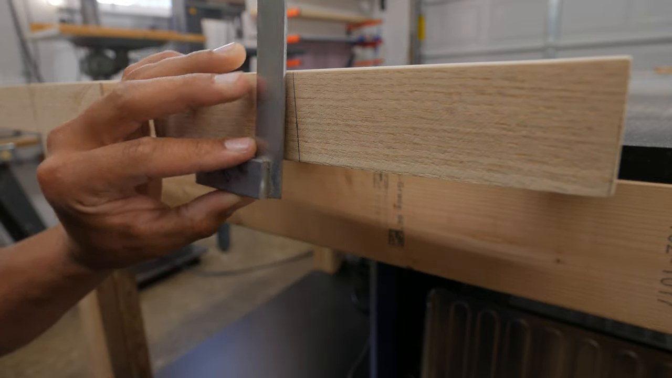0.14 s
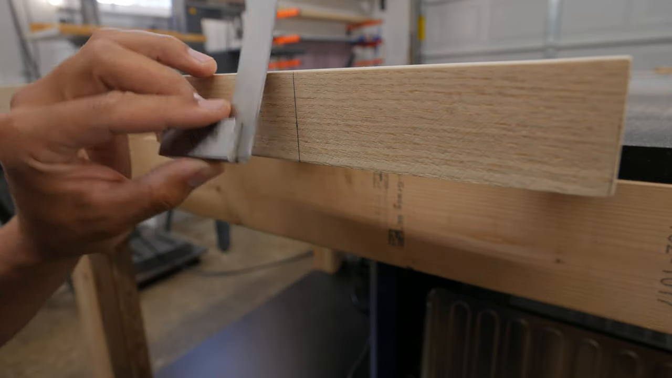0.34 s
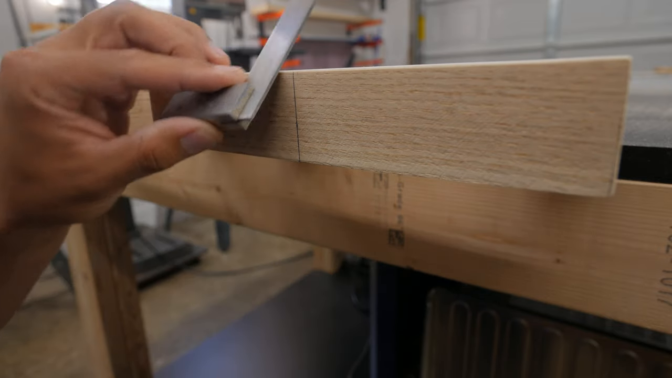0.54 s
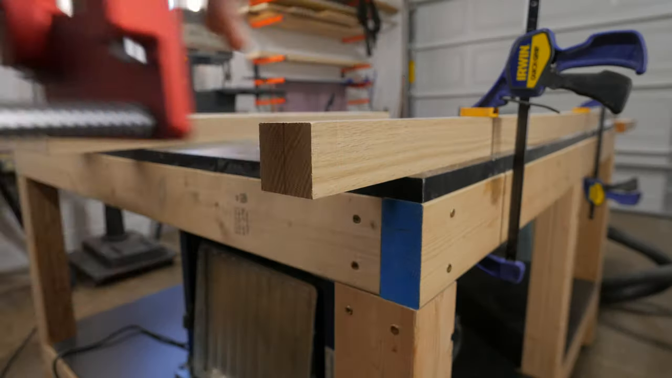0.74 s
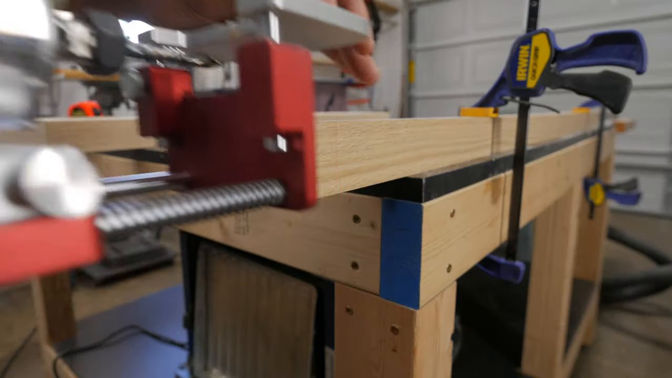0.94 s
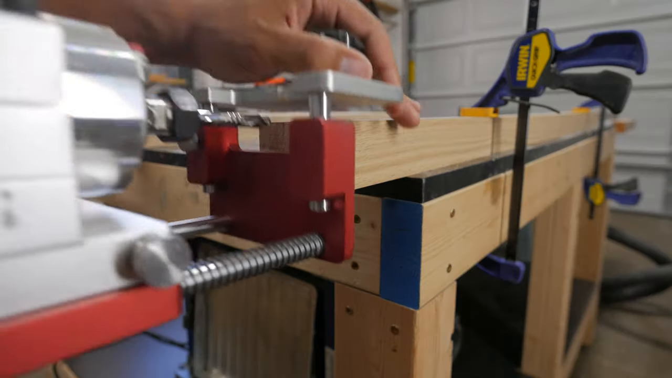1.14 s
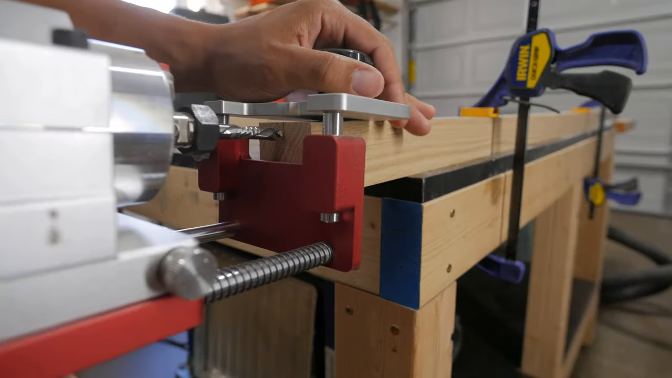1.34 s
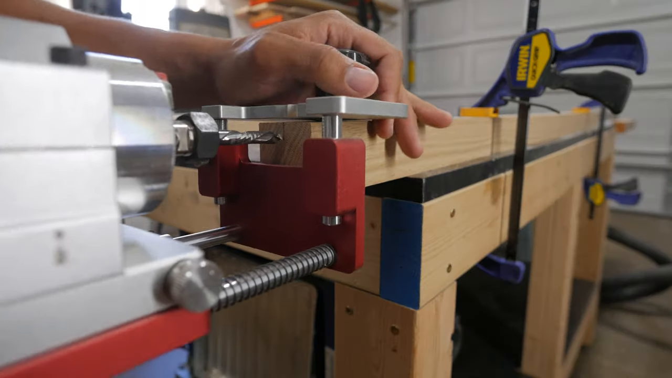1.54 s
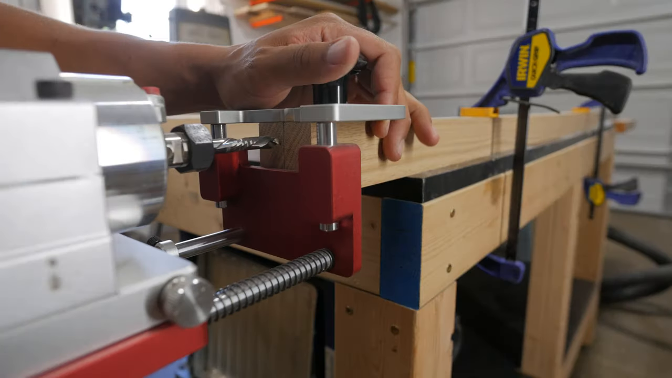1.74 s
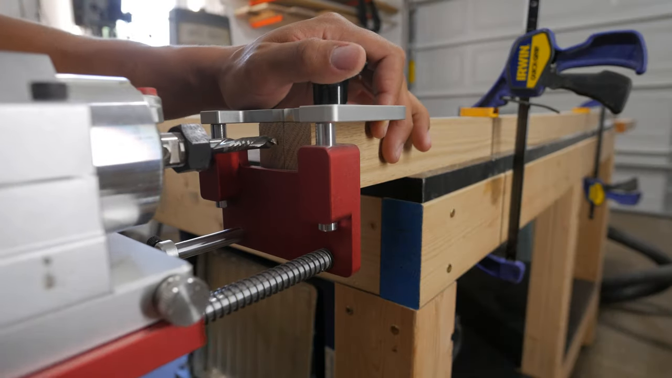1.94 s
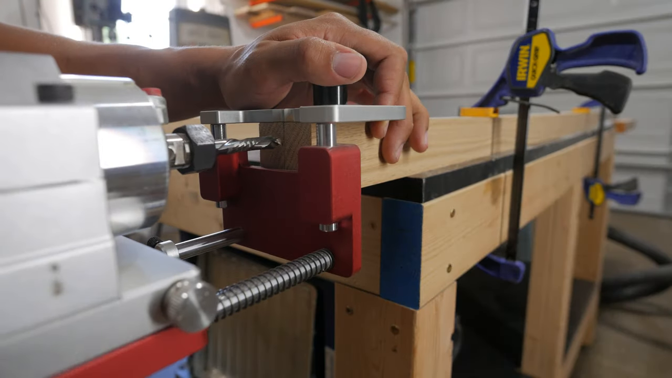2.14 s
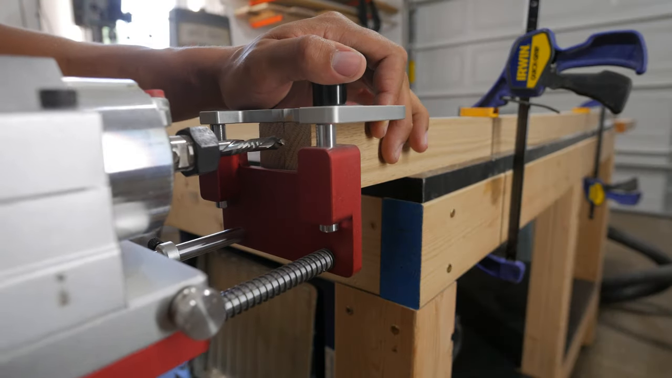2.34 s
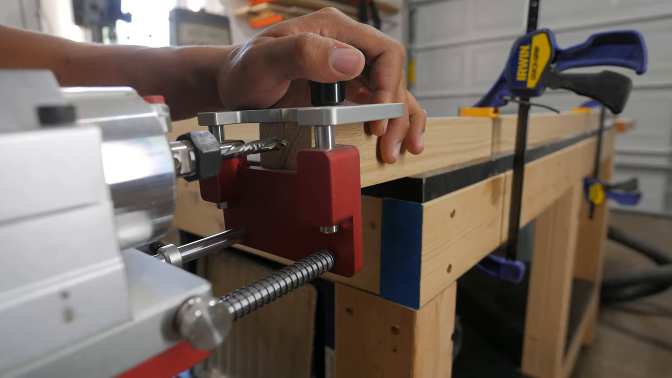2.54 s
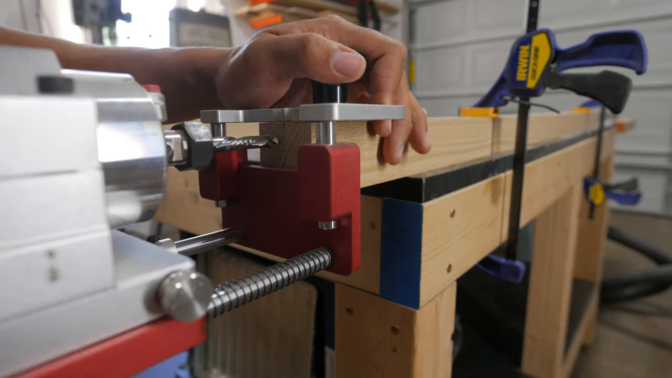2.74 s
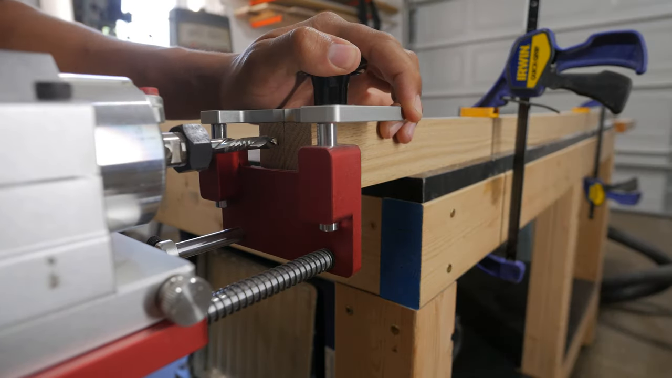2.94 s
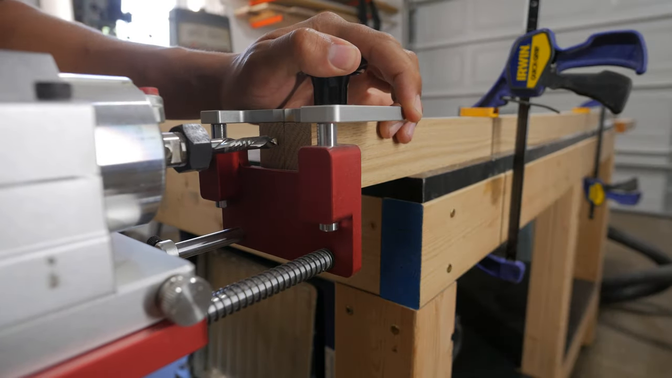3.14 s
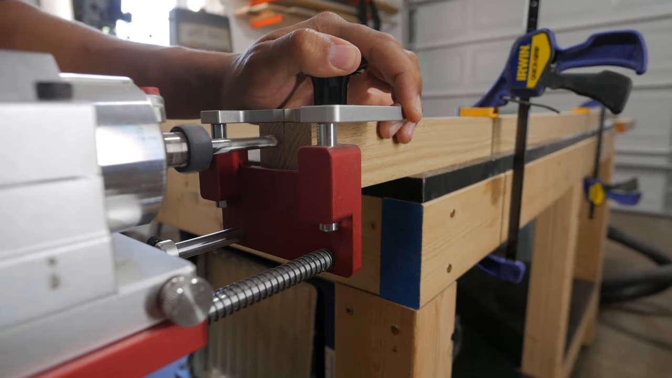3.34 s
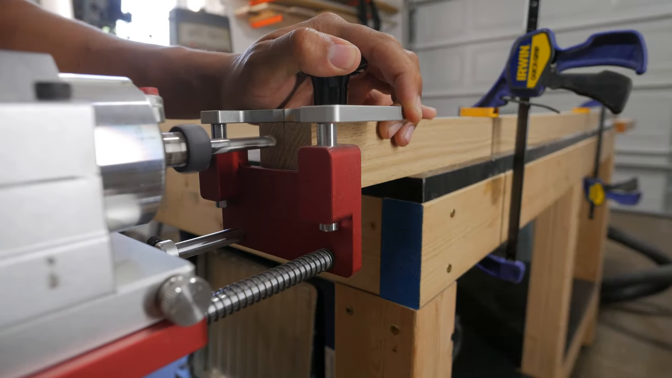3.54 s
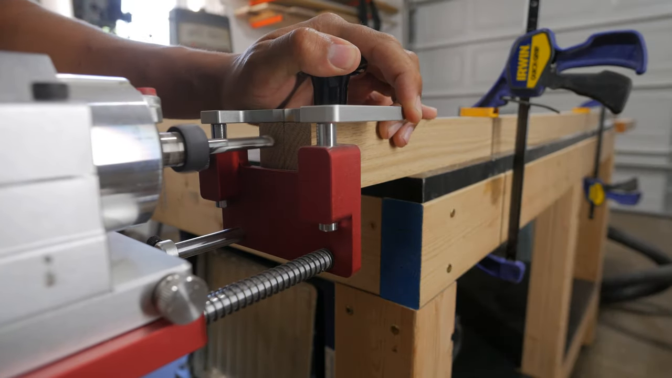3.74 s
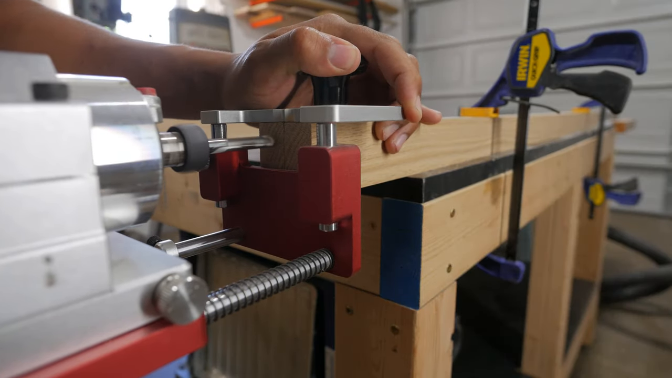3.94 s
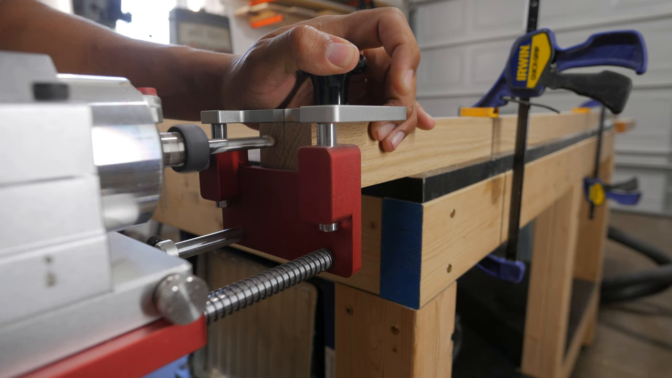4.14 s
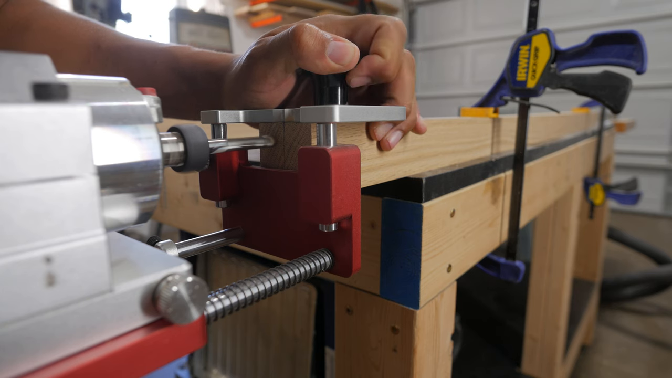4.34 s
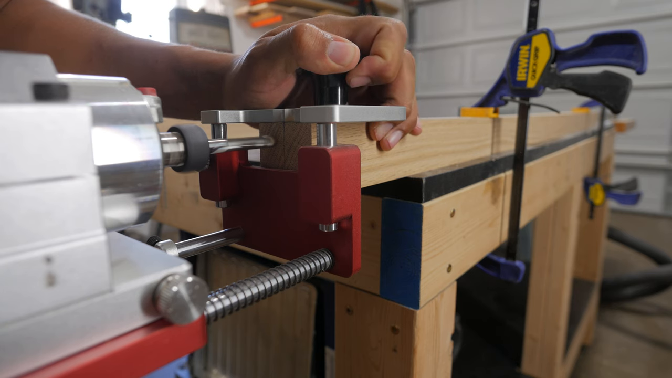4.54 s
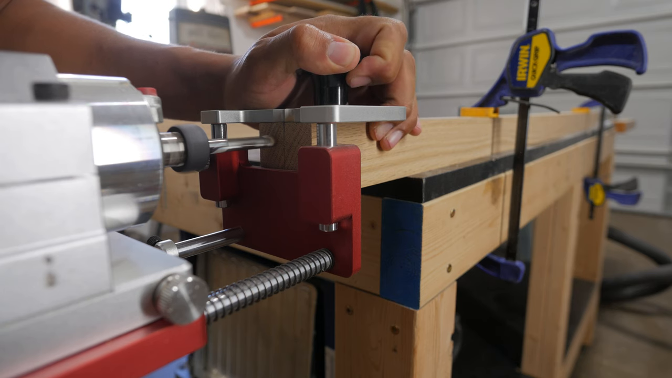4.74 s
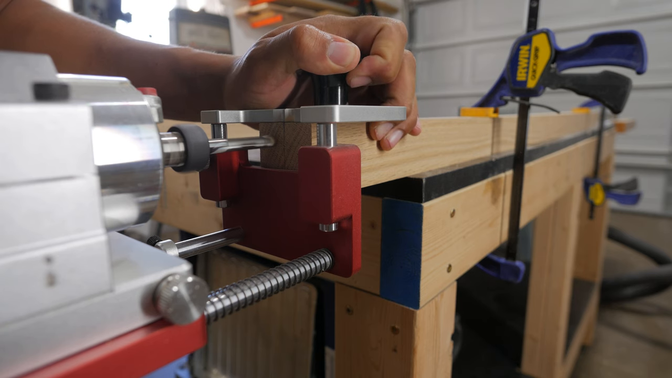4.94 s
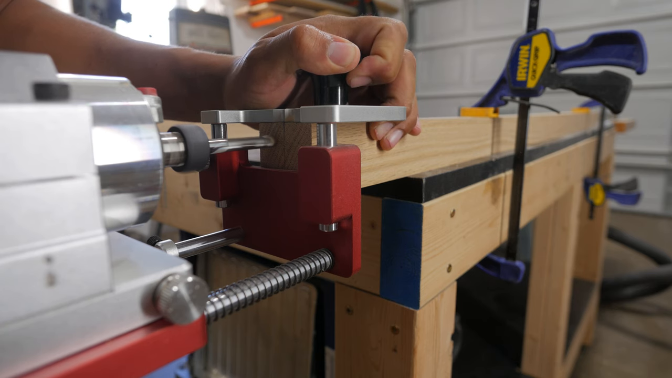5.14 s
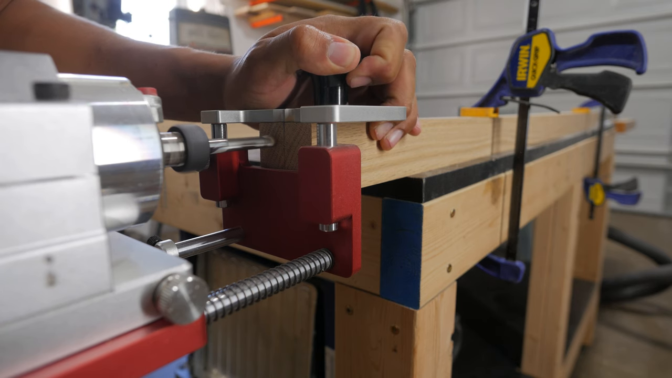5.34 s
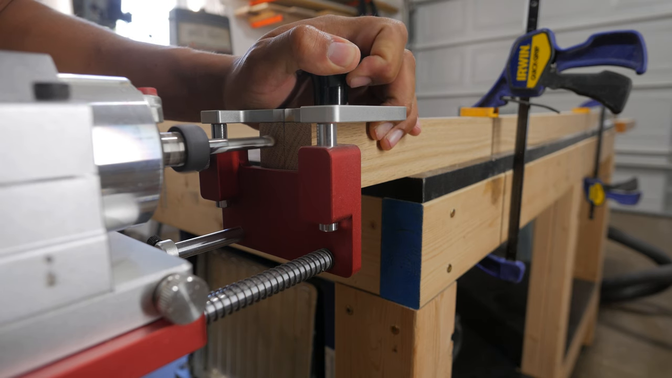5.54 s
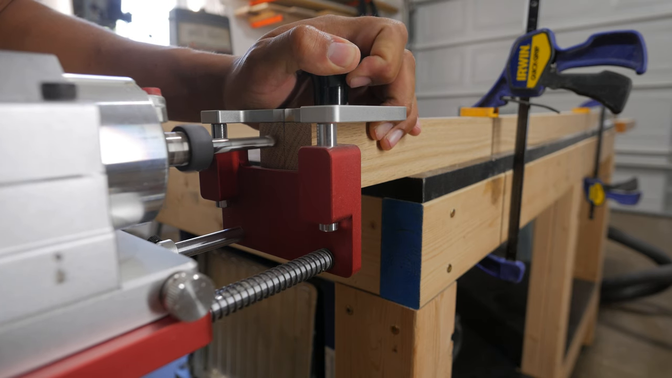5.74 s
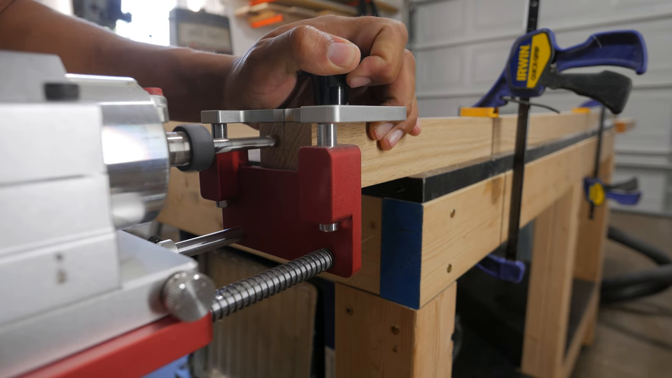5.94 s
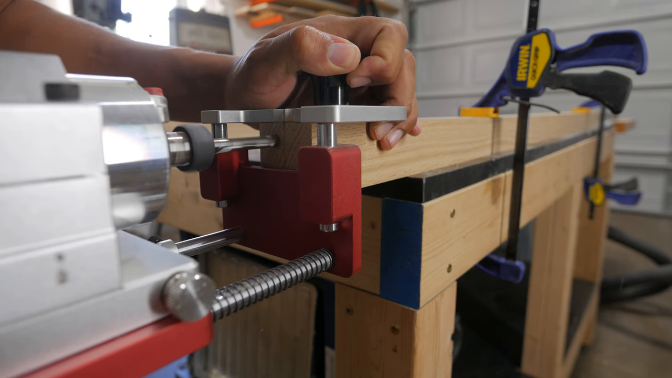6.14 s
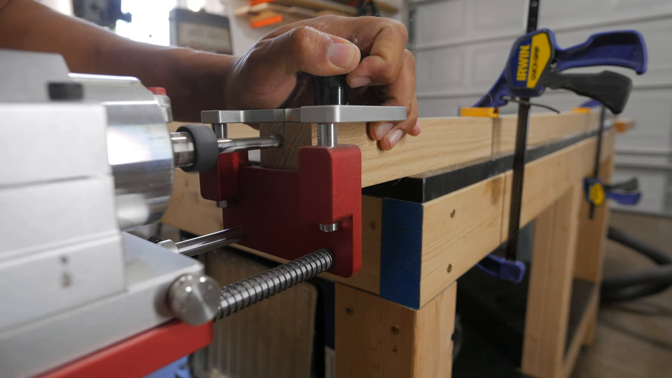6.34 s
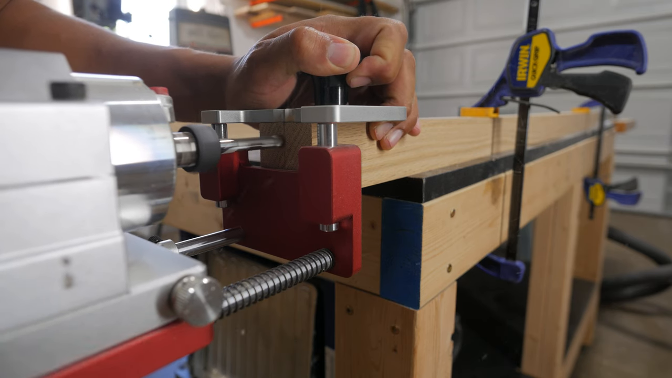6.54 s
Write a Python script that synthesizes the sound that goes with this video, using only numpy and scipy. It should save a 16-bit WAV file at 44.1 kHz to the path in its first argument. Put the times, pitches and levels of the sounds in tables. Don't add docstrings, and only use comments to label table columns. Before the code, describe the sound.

Close sounds at a wooden bench: two soft knocks over a weak distant hum, then a hard ringing metal tap. The scene jumps to a machine thumping and knocking into place, with faint high slide squeaks, small ticks and skin rustle. After a quiet moment its switch clicks and the brushed motor surges with a buzzing throb into a steady fan roar that continues to the end.

```python
import sys
import numpy as np
from scipy import signal
from scipy.fft import rfft, irfft, next_fast_len
from scipy.io import wavfile
from scipy.ndimage import uniform_filter1d, map_coordinates

SR = 44100
rng = np.random.default_rng(int(sys.argv[2]) if len(sys.argv) > 2 else 0)


def int16_out(signal):
    q = np.round(np.clip(np.atleast_2d(signal).T, -1, 1) * 32767)
    wavfile.write(sys.argv[1], SR, q.astype(np.int16))


def how_loud(loudness_db):
    steps = np.asarray(loudness_db, float) / 20
    return 10 ** steps


N = 290619


def unit(x):
    return x / np.sqrt(np.mean(x ** 2) + 1e-20)


def along(points, hz):
    f, v = np.transpose(points)
    return np.interp(np.log(hz + 1), np.log(f + 1), v)


def curves(rows):
    s, *cols = np.transpose(rows)
    return [np.interp(np.arange(N) / SR, s, c) for c in cols]


def during(start, stop):
    t = np.arange(N) / SR
    return (t >= start) & (t < stop)


def wobble(rate):
    coarse = np.arange(0, N + 16, 16)
    knots = rng.standard_normal(int(N * rate / SR) + 4)
    return np.interp(np.arange(N), coarse, map_coordinates(knots, [coarse * rate / SR]))


def filtered(x, response):
    m = next_fast_len(x.shape[-1] + 8192)
    return irfft(rfft(x, m) * response(np.fft.rfftfreq(m, 1 / SR)), m)[..., :x.shape[-1]]


def high_pass(x, corner_hz):
    return filtered(x, lambda f: (1j * f / (corner_hz + 1j * f)) ** 2)


def hiss(spectrum):
    return unit(filtered(rng.standard_normal(N), lambda hz: how_loud(along(spectrum, hz))))


def tone(hz):
    return np.sqrt(2) * np.sin(2 * np.pi * (np.cumsum(hz) / SR + rng.random()))


def modes(body):
    return lambda f: sum((-1) ** k * how_loud(db) * 1j * f * w / (c * c - f * f + 1j * f * w)
                         for k, (c, w, db) in enumerate(body))


def echo(t60):
    hz, t, z = signal.stft(rng.standard_normal(SR), SR, nperseg=256)
    decay = how_loud(-60 * t / t60 * (1 + hz[:, None] / 4000))
    tail = signal.istft(z * decay, SR, nperseg=256)[1][:SR]
    tail = tail * (1 - np.exp(-np.arange(SR) / SR / 0.00071))
    return tail / np.linalg.norm(tail)


CUTS = [.7278, 2.8975]


def swells(rows, rise):
    t, edges, power = np.arange(0, N, 64) / SR, np.array([0, *CUTS, 9]), 0
    for s, fade, db in rows:
        lag = (t - s) / abs(fade)
        same_shot = np.searchsorted(edges, t, "right") == np.searchsorted(edges, s, "right")
        power = power + how_loud(2 * db - 20 * np.where(lag > 0, lag, -lag / rise)) * same_shot
    return np.sqrt(np.repeat(power, 64)[:N])


ON_S, RAMP_S, RAMP_PER_S2 = 3.333, 3.455, 1000
CREEP, TOP_TURNS, KNEE = 80, 495.2, 9


def rotor():
    ramp = CREEP * np.logaddexp(0, RAMP_PER_S2 * (np.arange(N) / SR - RAMP_S) / CREEP)
    ramp = np.maximum(ramp - ramp[round(ON_S * SR)], 0)
    return ramp / (1 + (ramp / TOP_TURNS) ** KNEE) ** (1 / KNEE)


# time in seconds, level in dB.
CURRENT = [(3.33, -37), (3.36, -23), (3.395, -16), (3.43, -2), (3.57, -3.5), (3.7, -1.5), (3.77, -13),
           (3.86, -13), (3.95, -24), (4.3, -37)]


def motor_current():
    return curves(CURRENT)[0]


# start in seconds, stop in seconds, level in dB.
DRONE = [
    (0, .345, -43),
    (.385, 0.44, -45),
    (.6, 1, -33.5),
]


def far_drone():
    fits = uniform_filter1d(sum(how_loud(db) * during(start, stop) for start, stop, db in DRONE), size=1300)
    hz = 114.5 + 30 * np.arange(N) / SR
    return during(0, CUTS[0]) * fits * tone(hz)


# frequency in Hz, density in dB per Hz.
RUMBLE = [(15, -65.5), (25, -56.5), (54, -13), (173, -6), (207, -1.5), (288, -10.5), (320, -4), (345, -9),
          (465, -11), (900, -40), (1170, -62.5), (1980, -120)]
SHUFFLE = [(300, -29), (600, 11.5), (1200, 4), (2500, -3.5), (3300, -8.5), (5000, -69)]
RUSTLE = [(1500, -1), (3000, 3.5), (5500, 4), (8000, 3), (11000, 1), (16000, -5)]
# rumble in dB, shuffle in dB, rustle in dB.
SHOTS = [
    (-47.5, -52.5, -59.5),
    (-49.5, -59.5, -62.5),
    (-56, -69.5, -69),
]
# time in seconds, fade in seconds, rumble in dB, shuffle in dB.
MOVES = [(.27, 0.15, -45, -56), (.72, 0.066, -34, -62), (0.758, 0.24, -46, -47), (1.25, 0.57, -62, -51),
         (1.76, 0.14, -43.5, -59), (2.16, 0.23, -46.5, -75), (2.861, 0.12, -36.5, -56.5)]
# time in seconds, fade in seconds, level in dB.
BRUSHES = [(.25, 0.36, -59.5), (.74, .2, -57.5), (.862, 0.063, -44.5), (1.29, .15, -77),
           (1.915, 0.037, -50.5), (1.99, .03, -59), (2.155, 0.1, -54), (2.3, 0.14, -55.5),
           (2.38, 0.06, -57), (2.48, 0.12, -57), (2.59, 0.099, -52), (2.73, 0.13, -59), (2.82, .025, -55),
           (2.89, .04, -59.5)]
MOVE_RISE, BRUSH_RISE = 0.82, 0.36
DUCK_DB, SHAKE_DB = -18, -48.5


def workshop():
    rumble = hiss(RUMBLE) * how_loud(1.2 * wobble(14))
    shuffle = hiss(SHUFFLE) * how_loud(1.9 * wobble(25))
    rustle = hiss(RUSTLE) * how_loud(1.0 * wobble(60))
    shot = np.searchsorted(CUTS, np.arange(N) / SR, "right")
    rest = how_loud(np.array(SHOTS)[shot].T + DUCK_DB * (rotor() / TOP_TURNS) ** 2)
    shake = during(ON_S, 9) * how_loud(SHAKE_DB + motor_current())
    floor_moves = swells([(s, fade, db) for s, fade, db, _ in MOVES], MOVE_RISE)
    shuffle_moves = swells([(s, fade, db) for s, fade, _, db in MOVES], MOVE_RISE)
    out = rumble * (np.hypot(rest[0], floor_moves) + shake)
    out += shuffle * np.hypot(rest[1], shuffle_moves)
    return out + rustle * np.hypot(rest[2], swells(BRUSHES, BRUSH_RISE))


# frequency in Hz, width in Hz, level in dB.
BOARD = [(220, 37, -2.5), (355, 66, -2), (555, 40, -3), (1686, 300, -17.5)]
SQUARE = [(131, 20, -6), (196, 7, 6), (315, 30, -2.5), (383, 28, -1.5), (576, 19, -4), (1083, 30, -4),
          (1270, 110, -10), (1480, 120, -13), (1635, 13, 0), (1815, 17, 1.5), (2050, 41, -12),
          (2280, 120, -14), (2470, 70, -11), (3150, 350, -29)]
FENCE = [(349, 84, -1), (500, 160, -2), (790, 210, -3), (1570, 670, -12), (3080, 1200, -14.5)]
BENCH = [(132, 20, 1), (205.7, 10, 6.5), (293, 56, -1), (347, 23, 0.5), (410, 63, -2), (657, 124, -6),
         (713, 45, -2.5), (870, 150, -8), (1000, 120, -8.5), (1420, 560, -19), (3200, 960, -18)]
# time in seconds, blow in dB, echo in dB, echo t60 in seconds, contact cut-off in Hz.
KNOCKS = [
    (0.1963, -29.5, 4, 0.27, 450),
    (0.2139, -28, 0, 0.51, 1100),
    (.582, -16, 4, 1, 2640),
    (0.8551, -27, 9, 0.87, 1990),
    (1.2585, -12.5, 6.5, 0.67, 1420),
    (2.7816, -34, 16, 0.2, 1026),
]


def knocks():
    out, t = np.zeros(N + SR), np.arange(SR) / SR
    bodies = [BOARD, BOARD, SQUARE, FENCE, BENCH, BENCH]
    for (s, blow_db, echo_db, t60, soft_hz), body in zip(KNOCKS, bodies):
        push = how_loud(echo_db) * echo(t60)
        push[0] += 1
        ring = filtered(push, lambda f: modes(body)(f) / (1 + 1j * f / soft_hz) ** 2 * (1j * f / (90 + 1j * f)) ** 2)
        stop = min(c for c in [*CUTS, 9] if c > s)
        loudness = np.sqrt(np.mean(ring[:SR // 10] ** 2))
        out[round(s * SR):][:SR] += how_loud(blow_db - 7.5) * ring / loudness * (t < stop - s)
    return out[:N]


# time in seconds, peak in dB, first ring in Hz, second ring in Hz, second
# ring in dB.
TICKS = [(.5821, -3.5, 1500, 5700, -15.5), (.5842, -8, 1780, 5300, -26), (.5882, -14, 1750, 1150, -18),
         (.598, -15.5, 200, 400, -30), (.615, -14.5, 205, 400, -30), (.5815, -35, 7300, 12000, 0),
         (.8525, -34, 2000, 4880, -9), (1.2592, -20, 2650, 3500, -14), (1.2612, -25, 3150, 5300, -14),
         (1.3, -24, 720, 950, -26), (1.328, -15.5, 228, 400, -30), (1.2597, -38, 7600, 5400, -1),
         (1.3444, -33, 2620, 3600, -8), (1.508, -50, 3850, 3300, -3), (1.546, -52, 3900, 4500, -3),
         (1.598, -50, 2400, 3400, -2.5), (1.6386, -42, 2500, 1900, -5), (1.666, -46, 2600, 5000, -5),
         (1.6881, -48, 2200, 4000, -3), (1.9101, -42, 2320, 10500, 0), (2.153, -44, 2800, 8600, 2),
         (2.7825, -41, 950, 1500, -10), (2.309, -32, 1800, 4050, 2), (2.3087, -32, 5700, 9500, 2),
         (2.3092, -40, 1300, 2800, 4), (3.256, -62, 3200, 9000, 3), (3.2606, -39, 3150, 6700, 13),
         (3.2605, -41, 1150, 10300, 16), (3.2606, -38, 3950, 9200, 6), (3.2607, -42, 5600, 8000, 7),
         (3.2607, -39, 13100, 14700, 2), (3.2652, -46, 3150, 850, 2)]
JOLTS = [(3.3415, -40, 720, 1300, -8), (3.3437, -46, 3200, 3600, -3), (3.3522, -47, 3300, 3600, -3),
         (3.3603, -47, 3150, 3600, -3), (3.3685, -47, 3200, 3500, -3), (3.3768, -46, 3200, 3500, -3),
         (3.3665, -35.5, 710, 1400, -10), (3.3815, -47, 1900, 1300, -4), (3.391, -41, 1350, 1600, -4),
         (3.4245, -40, 1350, 2100, -3), (3.449, -43, 1950, 1300, -3), (3.4745, -37, 1300, 1900, -2),
         (3.482, -31, 1900, 1300, -2), (3.4905, -35, 1350, 1900, -5), (5.81, -33.5, 470, 600, -6)]
THUDS = [
    (.8527, -10.5, 500, 1600, -24),
    (.2, -27, 330, 700, -20),
]
TICK_CYCLES, JOLT_CYCLES, THUD_CYCLES = 7.2, 51, 4


def ticks(rows, cycles, bass_hz):
    out, t = np.zeros(N + SR), np.arange(SR // 8) / SR
    for s, db, first_hz, second_hz, second_db in rows:
        first = np.sin(2 * np.pi * first_hz * t) * how_loud(-60 * t / (0.0069 + cycles / first_hz))
        second = np.sin(2 * np.pi * second_hz * t) * how_loud(second_db - 60 * t / .006)
        noise = uniform_filter1d(rng.standard_normal(len(t)), size=2)
        crack = noise * (0.24 * how_loud(second_db - 60 * t / 0.011) + how_loud(second_db - 25.5 - 60 * t / 0.11))
        hit = (first + second + crack) * (1 - np.exp(-t / 0.00013))
        out[round(s * SR):][:len(t)] += how_loud(db) * (hit + 0.14 * np.roll(hit, 170))
    return high_pass(out[:N], bass_hz)


# time in seconds, fade in seconds, level in dB.
GLIDE = [
    (.74, 0.18, -58.5),
    (1.02, 0.08, -49.5),
    (1.3, 0.1, -56.5),
    (1.42, 0.14, -57),
]
# frequency in Hz, width in Hz, level in dB.
RODS = [(3160, 240, 3), (5470, 1400, -1.5)]
# start in seconds, fastest moment in seconds, stop in seconds, top pitch in Hz,
# slope in Hz per second, level in dB.
SQUEAK = [(.728, .74, .772, 9900, 16000, -65), (.775, .805, .84, 10000, 22000, -67),
          (.948, 1.014, 1.066, 10480, 19000, -61.5), (1.066, 1.05, 1.105, 9900, 36000, -63),
          (1.19, 1.228, 1.262, 8560, 11000, -64), (1.28, 1.3, 1.37, 8450, 3000, -73),
          (1.375, 1.415, 1.49, 8400, 22000, -69)]
GLIDE_RISE = 2
ARC_ROUND_S, ARC_DB_PER_KHZ = .012, 1


def squeak():
    rub = unit(filtered(rng.standard_normal(N), modes(RODS)))
    out = during(CUTS[0], CUTS[1]) * swells(GLIDE, GLIDE_RISE) * rub
    for start, fastest, stop, top_hz, slope, db in SQUEAK:
        lag = np.hypot(np.arange(N) / SR - fastest, ARC_ROUND_S) - ARC_ROUND_S
        sag = np.minimum(slope * lag, top_hz / 2)
        gate = uniform_filter1d(1. * during(start, stop), size=300)
        level = how_loud(db - ARC_DB_PER_KHZ * sag / 1e3 + 4.1 * wobble(59.6))
        out += gate * level * tone(top_hz - sag + 40 * wobble(200))
    return out


# multiple of twice mains, level in dB.
HUM = [(1, 5), (2, 5), (3, -17), (6, -13)]


def mains_hum(cycle):
    hum = sum(how_loud(db) * np.sqrt(2) * np.sin(2 * np.pi * k * (cycle + 0.338)) for k, db in HUM)
    return how_loud(-43.5 + 1.03 * motor_current()) * hum


# frequency in Hz, width in Hz, level in dB.
CASING = [(702, 60, 12), (1150, 70, 10), (1360, 120, 8.5), (1890, 130, 1), (2190, 120, -12), (3130, 91, 1),
          (3650, 300, -2), (5030, 800, -20)]


def brush_buzz(burst):
    buzz = burst ** 1.9 * how_loud(1.1 * wobble(60)) * rng.standard_normal(N)
    return filtered(how_loud(-40 + 0.54 * motor_current()) * buzz, modes(CASING))


# shaft order, level in dB, family (0 slot tone, 1 overtone).
SLOTS = [(6, -15, 0), (8, -11, 0), (12, 0.5, 0), (24, 0, 1), (36, -3.5, 1), (48, -7, 1)]
# frequency in Hz, level in dB.
RADIATES = [(600, -22), (1200, -5), (1750, -1.5), (2100, -4), (2500, -5), (2750, 5), (3100, 6), (3500, 3),
            (3900, -3), (4350, 1), (4700, -1), (5150, -1), (5600, -12), (6800, -1), (7700, -9), (8500, -7),
            (12000, -14)]
# frequency in Hz, level in dB.
OVERTONE_NEEDS = [(2250, -16), (2750, 0), (3200, -1), (3600, 1), (4200, 2), (4700, 0), (5200, -4),
                  (6000, -3), (6800, 2), (9000, 2), (12000, 1)]
WHINE_DB = [-33.5, -33]
WHINE_GROWS = [1.8, .8]
WHINE_FULL_DB, WHINE_TORQUE = -11.5, 1.4
OVERTONE_LOSS_DB = 18
THROB, THROB_EVENS = 2.1, 1.3
TOP_HZ = 15720


def slot_whine(turns, torque, fired):
    speed = turns / TOP_TURNS
    speed_db = 20 * np.log10(speed + 1e-4)
    family_db = []
    for row, (db, grows) in enumerate(zip(WHINE_DB, WHINE_GROWS)):
        growth = grows * np.minimum(speed_db - WHINE_FULL_DB, 0)
        pull = WHINE_TORQUE * 20 * np.log10(torque)
        family_db.append(db + growth + pull - row * OVERTONE_LOSS_DB * speed ** 2)
    depth = THROB - THROB_EVENS * speed
    swell = np.exp(depth * np.cos(2 * np.pi * ((fired + .16) % 1) ** .6 - np.pi))
    swell = swell / np.sqrt(1 + depth ** 2 + depth ** 4 / 4 + depth ** 6 / 36)
    whine = 0
    for k, db, row in SLOTS:
        hz = k * turns
        radiated_db = along(RADIATES, hz) + row * along(OVERTONE_NEEDS, hz)
        level = how_loud(family_db[row] + db + radiated_db + (1 + .6 * row) * wobble(35))
        whine = whine + level * tone(hz * (1 + (.005 + .004 * row) * wobble(200))) * (hz < TOP_HZ)
    return swell * whine


# frequency in Hz, density in dB per Hz.
HOUSING = [(24, -85), (40, -35), (108, -19.5), (227, -20), (362, -12.5), (450, -12.5), (530, -10.5),
           (802, -8.5), (1220, -7), (1500, -4.5), (1680, -5), (1900, -6.5), (2200, -7), (2480, -15.5),
           (3000, -10), (3900, -16), (6600, -120)]
FAN = [(1470, -21), (2500, -5), (2900, -6), (3350, -0.5), (3650, -4.5), (4200, -8.5), (4620, 0),
       (5250, 2.5), (5550, -3.5), (5900, -2.5), (6200, -7.5), (6650, -1.5), (7250, -6), (7710, -3.5),
       (9100, -8.5), (9600, -9), (10300, -6.5), (11200, -9.5), (12350, -9.5), (12700, -13.5), (14900, -18),
       (16000, -28)]
SPARKS = [(5500, -30), (8000, 3.5), (11000, -3), (14500, -4.5), (16000, -13)]
# frequency in Hz, width in Hz, level in dB.
RIDGES = [(607.4, 23, -2.5), (1355, 12, -3), (1405, 8.6, 2), (1592, 34, -5), (1647, 26, 0.5),
          (1695, 39, -1.5), (1840, 35, -0.5), (2077, 29, -3.5), (2280, 57, -1.5), (5190, 120, -9)]
HOUSING_DB, HOUSING_GROWS, STRAIN_DB, GROWL_DB = -31, 0.68, 4.5, -59
FAN_DB, FAN_GROWS, SPARK_DB = -31.5, 0.81, -43
RIDGE_DB, RIDGE_SWING_DB = -41.5, 2.5


def fan_roar(speed, torque, beat):
    speed_db = 20 * np.log10(speed + 1e-4)
    running = how_loud(HOUSING_DB + HOUSING_GROWS * speed_db + STRAIN_DB * torque)
    growl = how_loud(GROWL_DB + motor_current())
    housing_db = 20 * np.log10(np.hypot(running, growl))
    fan_db = FAN_DB + FAN_GROWS * speed_db
    roar = how_loud(housing_db + 0.4 * wobble(11)) * beat * hiss(HOUSING)
    roar += how_loud(fan_db + 1 + 0.82 * wobble(12)) * np.sqrt(beat) * hiss(FAN)
    for k in range(2):
        panels = unit(filtered(rng.standard_normal(N), lambda f: modes(RIDGES[k::2])(f) ** 2))
        roar += speed ** 2 * how_loud(RIDGE_DB + RIDGE_SWING_DB * wobble(5)) * panels
    return roar + how_loud(SPARK_DB) * torque * np.minimum(3 * speed, 1) ** 2 * beat * hiss(SPARKS)


# shaft order, level in dB.
SHAFT = [(1, -52), (2, -54), (3, -52), (5, -59), (8, -55), (9, -52.5), (12, -54), (13, -60), (15, -56.5),
         (16, -51.5), (21, -63), (24, -53.5)]
# time in seconds, level in dB.
RUNOUT = [(4, -1), (5.3, 0), (5.7, 0), (5.85, 4), (6, 0), (6.2, 0), (6.28, 4), (6.36, 2), (6.45, 9),
          (6.59, 4)]


def shaft_orders(turns):
    runout_db, = curves(RUNOUT)
    spin = 0
    for k, db in SHAFT:
        level = how_loud(db + 2.5 * wobble(4) + runout_db * (1 if k < 4 else .3))
        spin = spin + level * tone(k * turns * (1 + .0006 * wobble(40)))
    return spin * (turns / TOP_TURNS) ** 8


# time in seconds, delay in half waves.
FIRING = [(3.33, .52), (3.46, .38), (3.51, .23), (3.6, .16), (3.7, .07), (3.85, 0)]
MAINS_HZ = 60.05


def motor():
    torque = np.gradient(rotor()) * SR / RAMP_PER_S2 + 1e-4
    turns = rotor() * (1 + 0.0009 * wobble(6))
    speed = turns / TOP_TURNS
    cycle = 2 * MAINS_HZ * np.arange(N) / SR - .05
    fired = cycle - curves(FIRING)[0]
    burst = unit(np.exp(-(fired % 1) / .3))
    beat = 1 + .7 * np.clip(1 - speed, 0, 1) * (burst - 1)
    casing = slot_whine(turns, torque, fired) + brush_buzz(burst)
    roar = fan_roar(speed, torque, beat)
    room = signal.fftconvolve(how_loud(-6) * casing + how_loud(-24) * roar, echo(.35))[:N]
    near = high_pass(casing + roar + room, 110)
    return during(ON_S, 9) * (mains_hum(cycle) + near + shaft_orders(turns))


def scene():
    mid = workshop() + far_drone() + knocks() + squeak() + motor()
    mid += ticks(TICKS, TICK_CYCLES, 100) + ticks(JOLTS, JOLT_CYCLES, 100) + ticks(THUDS, THUD_CYCLES, 230)
    mid[round(CUTS[0] * SR)] += how_loud(-27)
    return np.array([mid, mid])


# frequency in Hz, side minus mid in dB.
SIDE_DB = [(60, -21.5), (110, -45.5), (200, -32), (380, -23), (700, -16), (1290, -20.5), (2380, -16),
           (4400, -14.5), (8120, -12.5), (15000, -4.5)]


def side_noise(hz, z):
    chance = rng.standard_normal((z.shape[1], 61))
    frame_db = 10 * np.log10(np.sum(np.abs(z) ** 2, axis=0) + 1e-12)
    busy = np.clip(.95 + .05 * (frame_db + 30), -.2, 1.3)
    block = np.clip(busy + .6, .2, 1)[:, None] * chance[:, :1] + .7 * chance[:, 1:]
    apart = block[:, 1 + (hz / hz[-1] * 58).astype(int)].T > busy + (hz[:, None] / 14500) ** 6
    level = np.sqrt(np.abs(uniform_filter1d(np.abs(z) ** 2, size=8, axis=0)))
    level = level * how_loud(along(SIDE_DB, hz) + 6)[:, None]
    phase = np.exp(2j * np.pi * rng.random(z.shape))
    return signal.istft(apart * level * phase, SR, nperseg=2048)[1][:N]


HOLE_FROM_HZ, HOLE_RARE, HOLE_DB = 7500, 1.75, -20
BASSY_DB = 24


def treble_holes(hz, z):
    starved = rng.standard_normal((len(hz) // 8 + 1, z.shape[1]))
    starved = unit(uniform_filter1d(starved, size=4, axis=1))[np.arange(len(hz)) // 8]
    bass = np.sum(np.abs(z[hz < 2000]) ** 2, axis=0)
    treble = np.sum(np.abs(z[hz > HOLE_FROM_HZ]) ** 2, axis=0)
    bassy_db = 10 * np.log10(bass / treble) - BASSY_DB
    lost = starved > HOLE_RARE - np.clip(bassy_db / 14, 0, 1)
    lost = lost * (hz[:, None] > HOLE_FROM_HZ) * (1 - how_loud(HOLE_DB))
    return signal.istft(z * lost, SR, nperseg=2048)[1][:N]


def roll_off(x):
    return signal.sosfilt(signal.butter(12, 16200, fs=SR, output="sos"), x)


def record(dry):
    hz, _, z = signal.stft(dry[0], SR, nperseg=2048)
    side = side_noise(hz, z)
    mix = dry - treble_holes(hz, z) + [side, -side]
    mix = filtered(mix, lambda f: f < TOP_HZ)
    return roll_off(mix)


dry = scene()
out = record(dry)
int16_out(out)
```